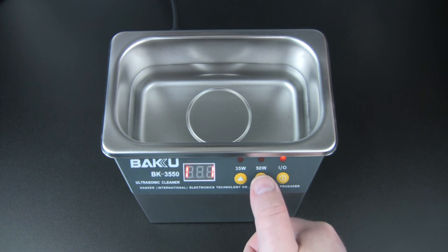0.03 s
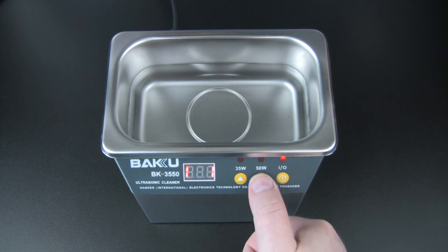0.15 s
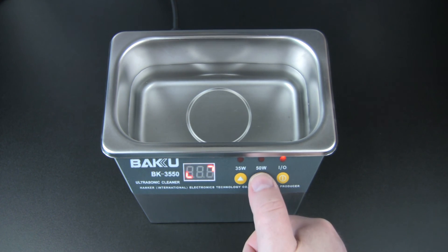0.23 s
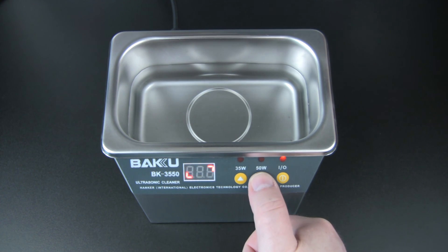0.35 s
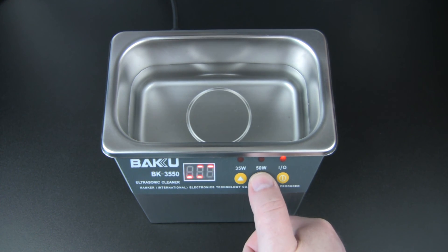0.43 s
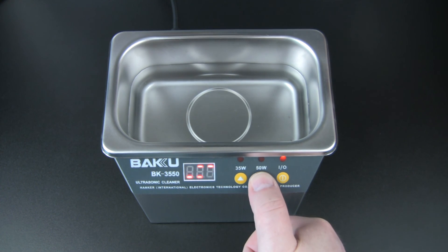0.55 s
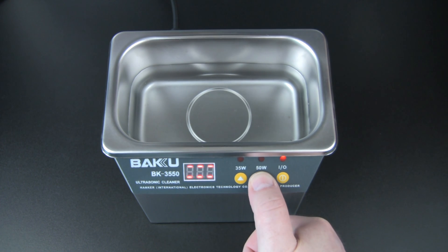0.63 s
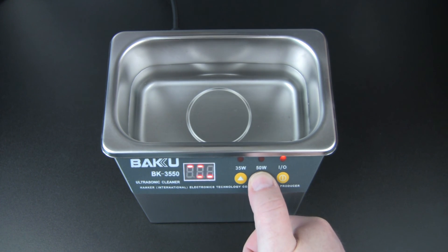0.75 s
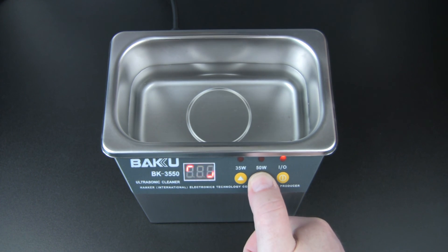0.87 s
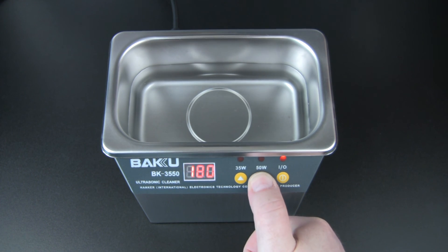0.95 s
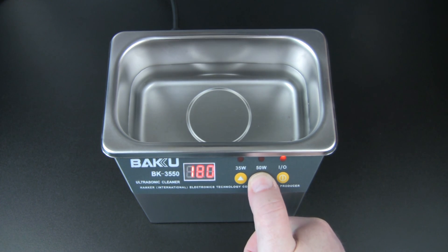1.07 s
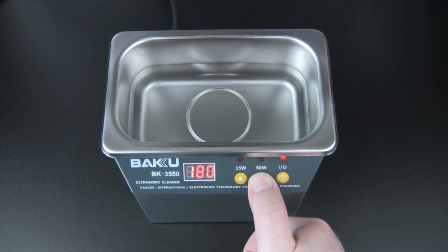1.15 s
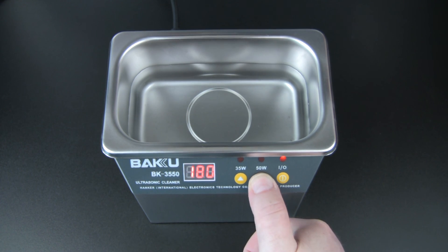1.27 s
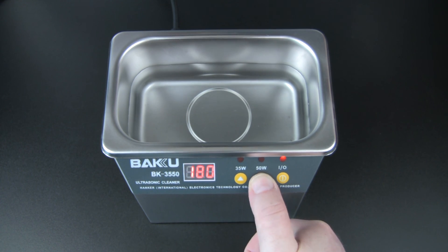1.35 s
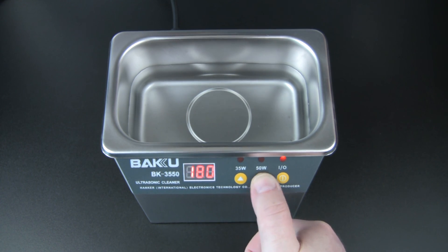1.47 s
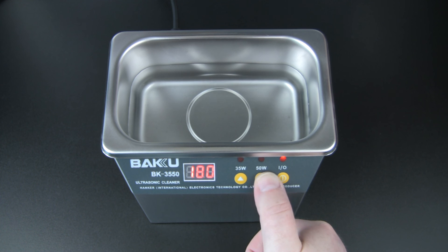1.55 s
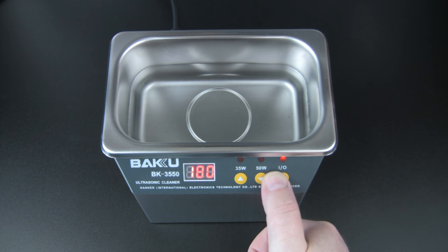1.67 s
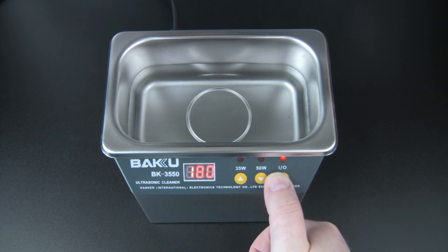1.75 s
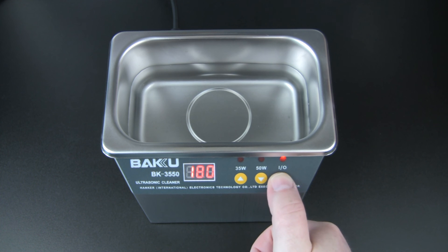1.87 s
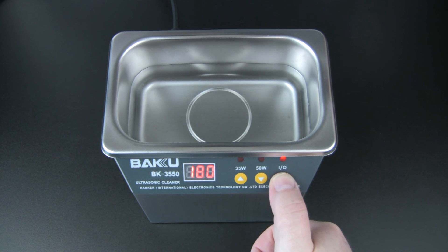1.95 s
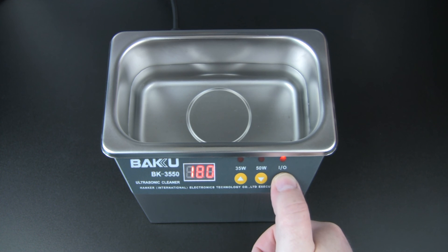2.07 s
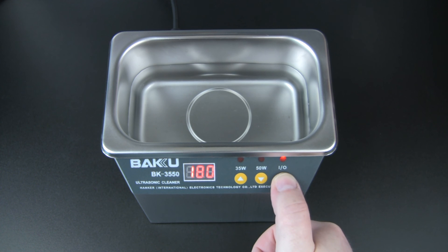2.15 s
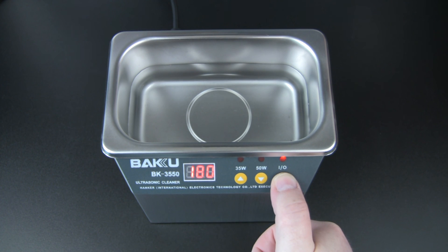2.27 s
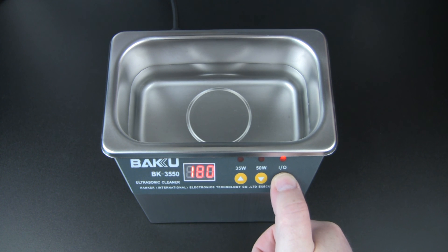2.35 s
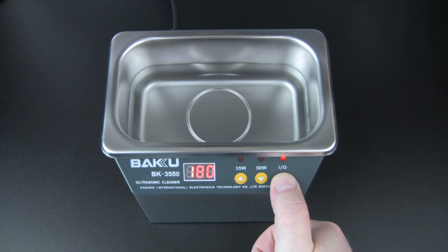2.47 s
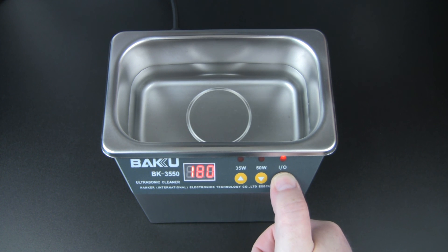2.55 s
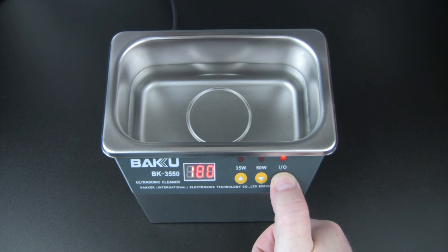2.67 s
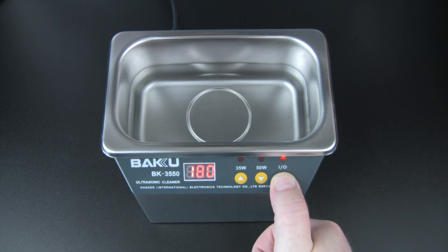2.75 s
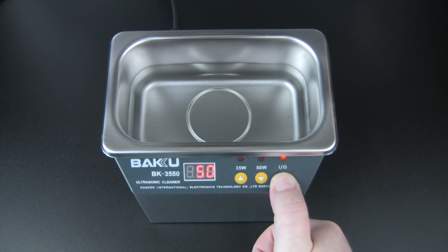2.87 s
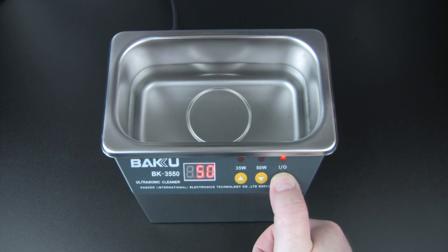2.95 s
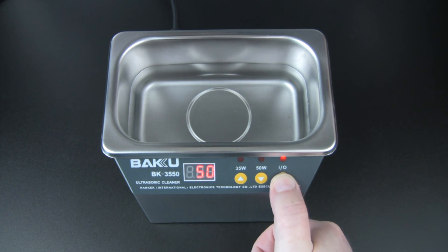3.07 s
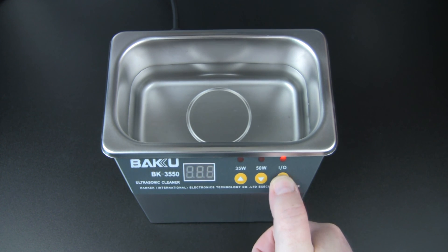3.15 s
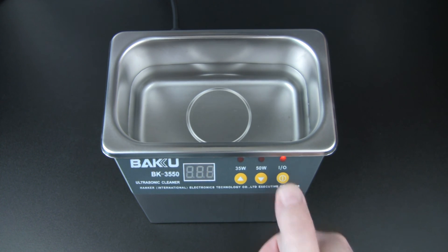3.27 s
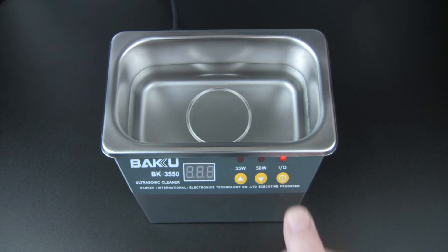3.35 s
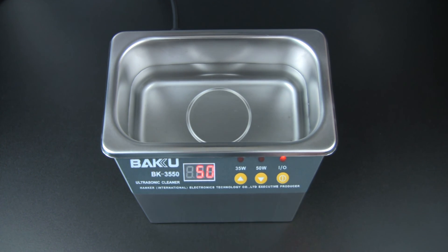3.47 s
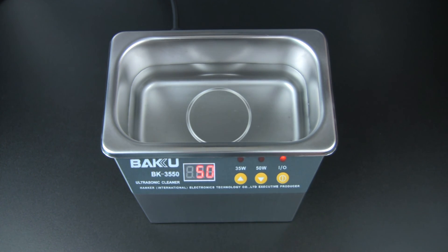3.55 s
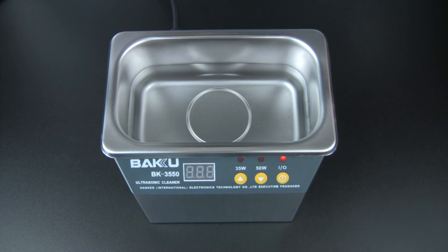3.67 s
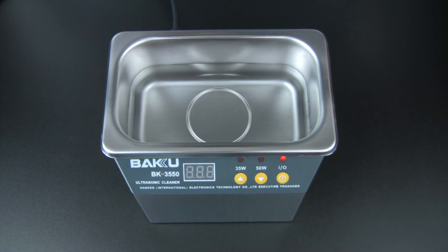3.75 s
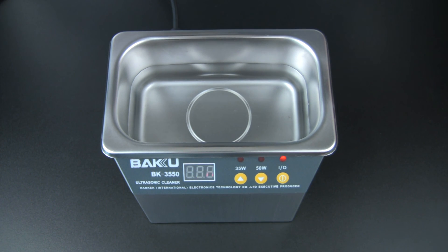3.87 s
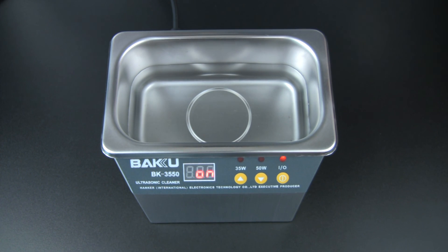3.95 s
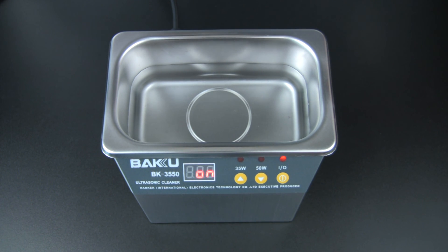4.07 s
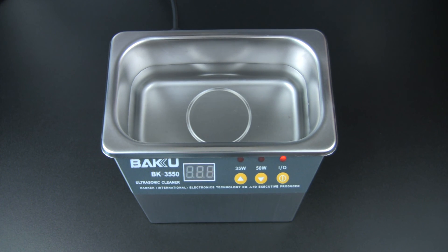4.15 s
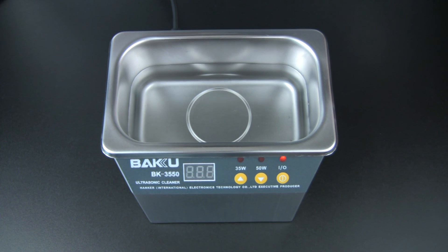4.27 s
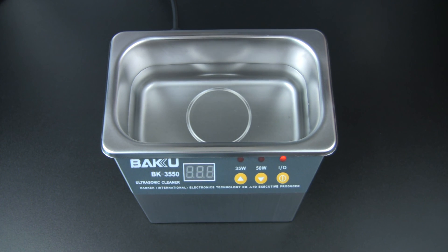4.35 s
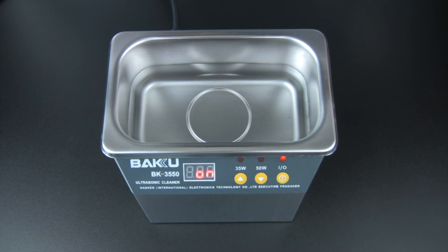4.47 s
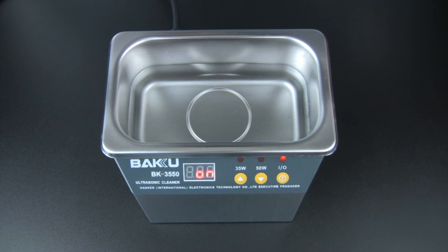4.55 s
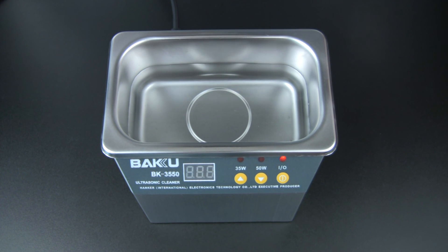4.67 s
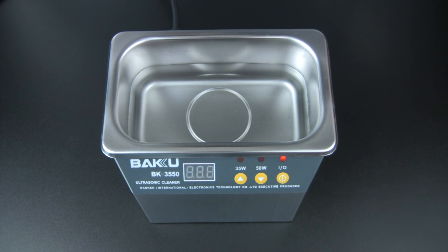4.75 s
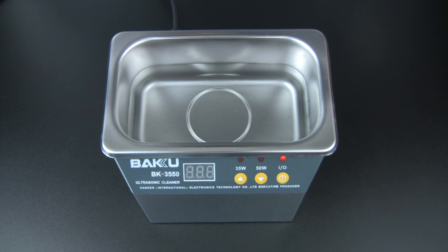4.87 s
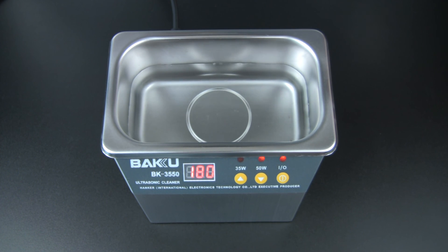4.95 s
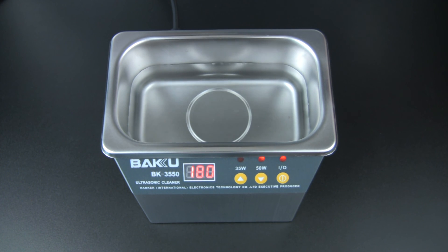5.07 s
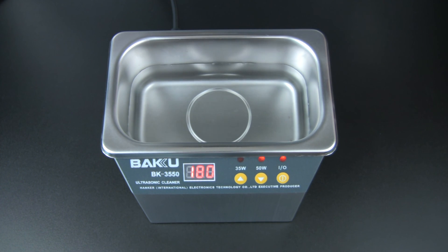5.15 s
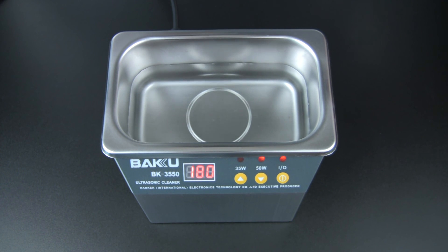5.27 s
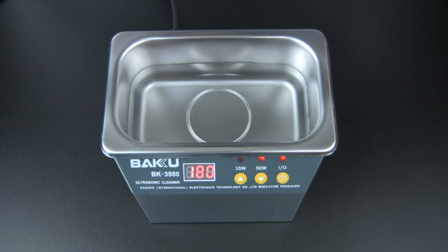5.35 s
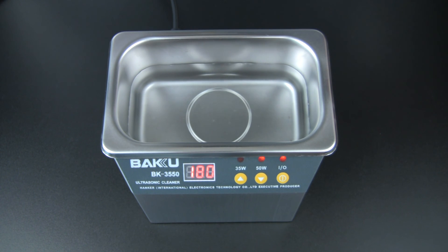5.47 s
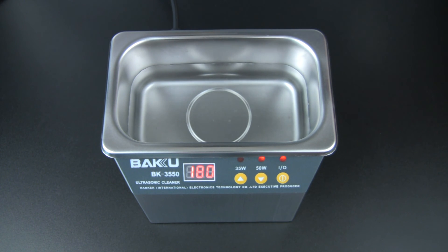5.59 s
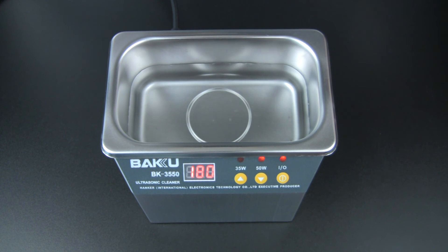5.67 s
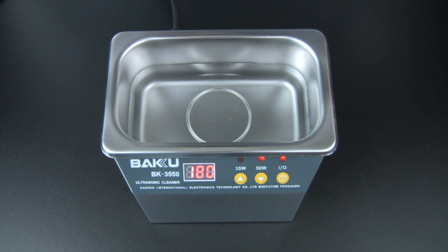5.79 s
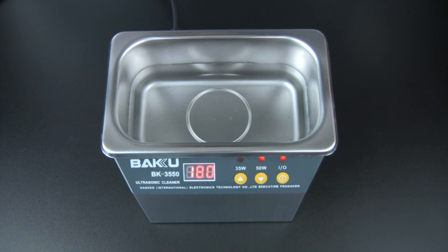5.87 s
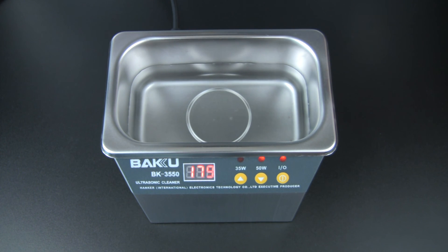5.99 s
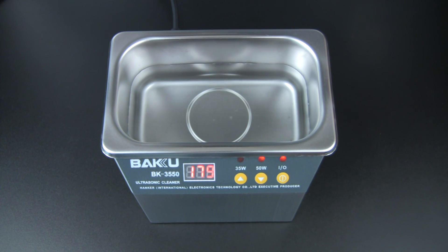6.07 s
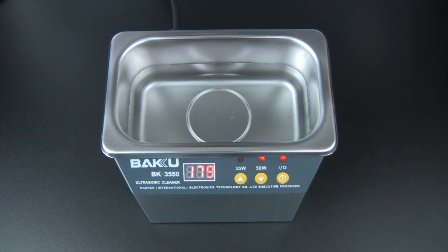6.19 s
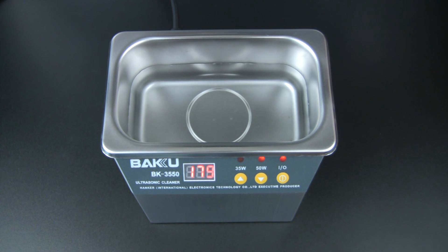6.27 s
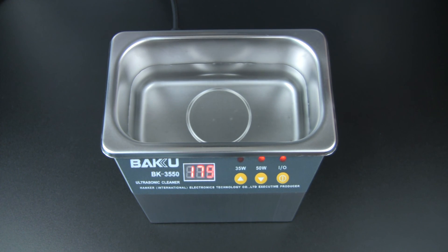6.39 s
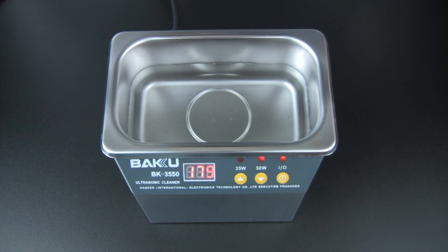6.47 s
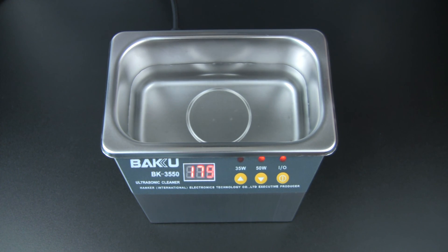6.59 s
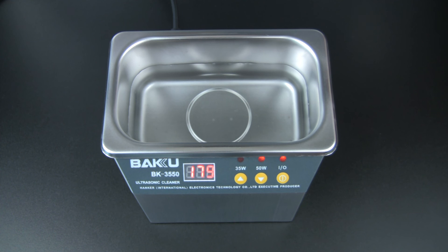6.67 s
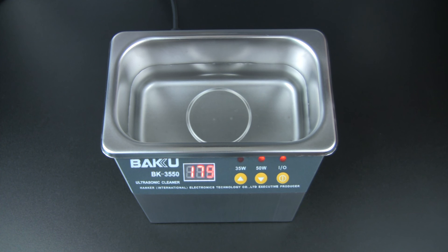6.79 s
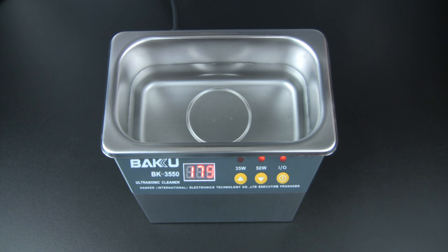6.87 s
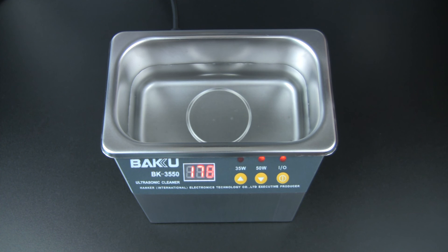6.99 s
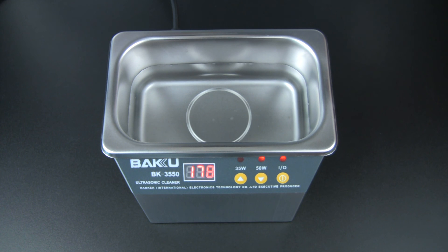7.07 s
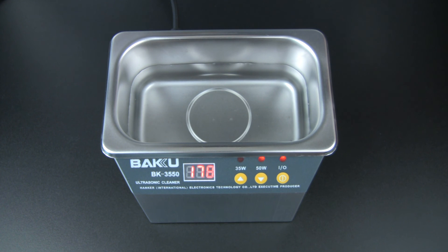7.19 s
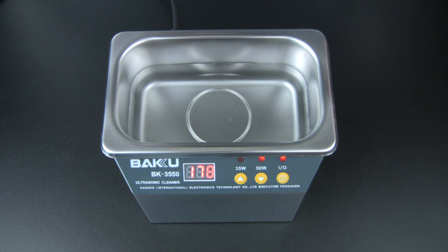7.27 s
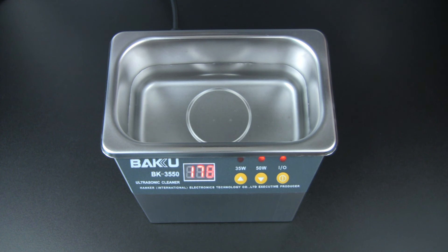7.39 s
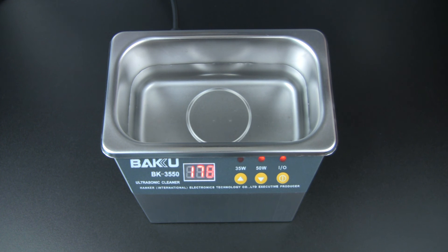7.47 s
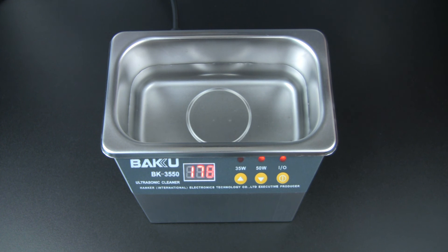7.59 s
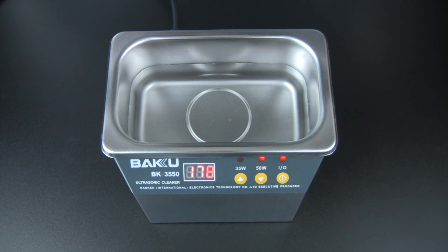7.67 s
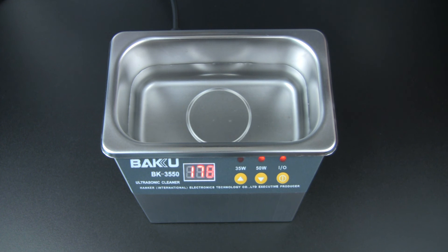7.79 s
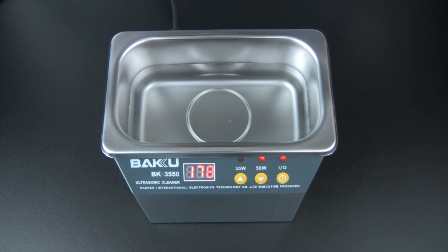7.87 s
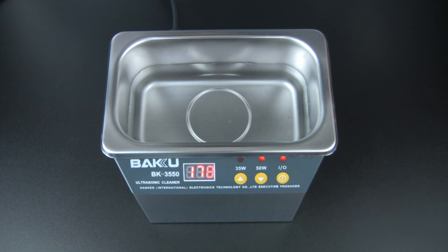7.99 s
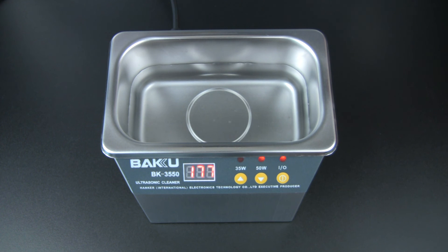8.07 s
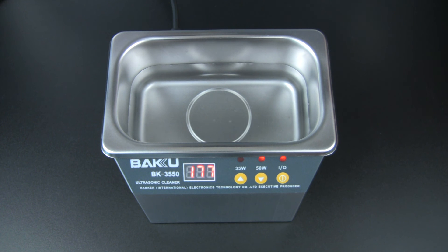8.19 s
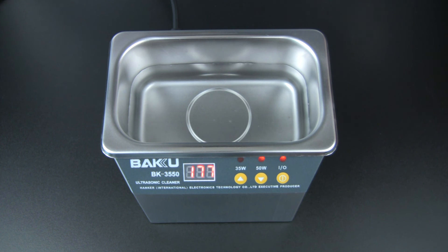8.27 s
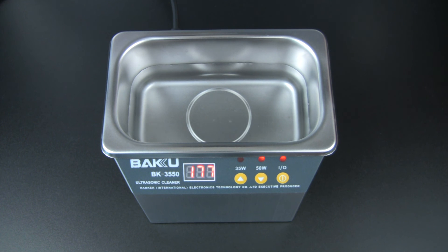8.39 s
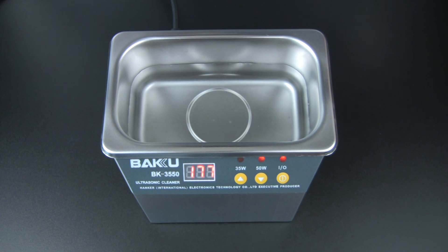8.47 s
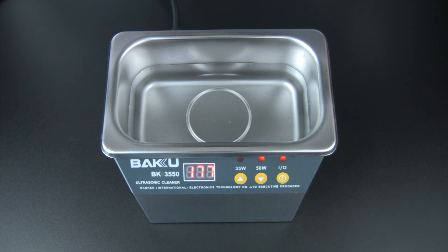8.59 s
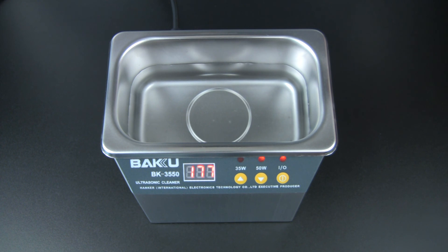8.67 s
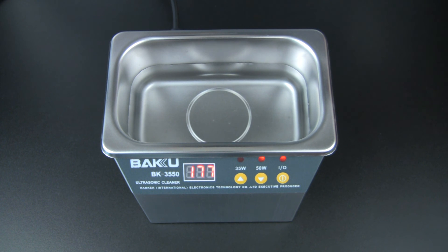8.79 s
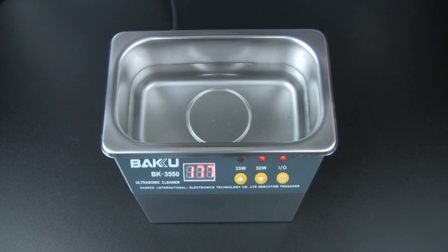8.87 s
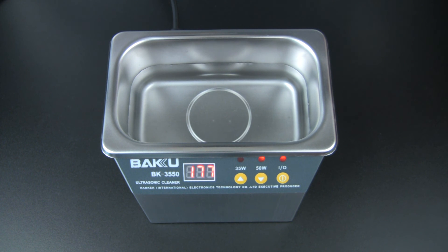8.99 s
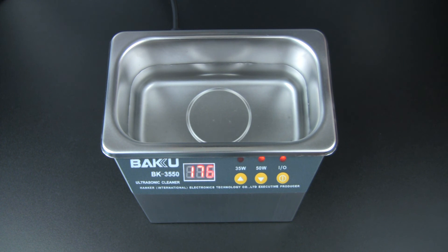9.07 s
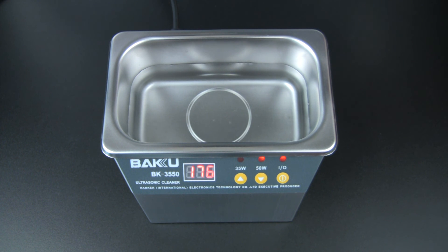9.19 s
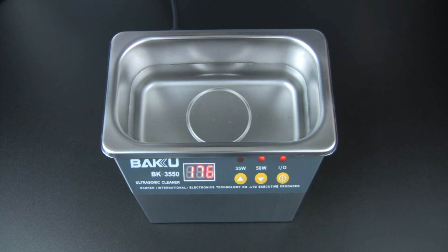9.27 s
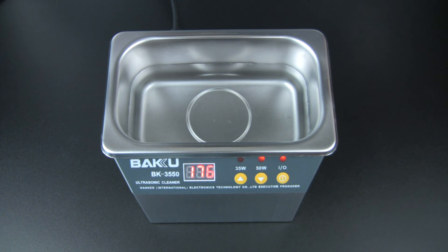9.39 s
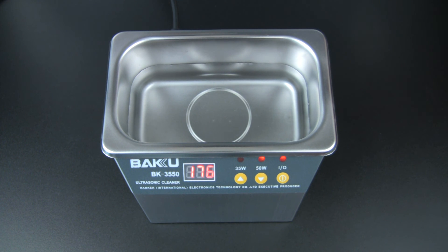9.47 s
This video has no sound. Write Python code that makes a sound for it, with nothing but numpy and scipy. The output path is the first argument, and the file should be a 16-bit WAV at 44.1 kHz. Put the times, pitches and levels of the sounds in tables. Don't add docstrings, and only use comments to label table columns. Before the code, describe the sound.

In a quiet room with soft fan noise, low distant traffic and a faint clock tick each second, a thumb presses a button on a small steel ultrasonic bath: sharp snap in, ringing snap back. A second button clicks the same way two seconds later. After a pause the bath starts with a brief crack and squeal, then holds a harsh electrical buzz under bright, sizzling hiss. Close stereo microphone.

```python
import sys
import numpy as np
from scipy import signal
from scipy.fft import rfft, irfft
from scipy.io import wavfile
from scipy.ndimage import uniform_filter1d, minimum_filter1d

SR = 44100
rng = np.random.default_rng(int(sys.argv[2]) if len(sys.argv) > 2 else 0)


def voltage_ratio(level):
    return 10 ** (np.asarray(level, float) / 20)


def wrap_up_sound(samples):
    columns = np.atleast_2d(samples).T
    tamed = np.clip(columns, -1, 1)
    steps = np.round(tamed * 32767).astype(np.int16)
    wavfile.write(sys.argv[1], SR, steps)


N = 420713
START_S = 4.9535
PULSE_HZ, PULSE_AT_S = 99.949, 6.0102


def evened(x):
    return x / np.sqrt(np.mean(abs(x) ** 2) + 1e-20)


def read(points, hz):
    f, value = np.transpose(points)
    return np.interp(np.log(hz + 1), np.log(f + 1), value)


def curve(rows, column):
    rows = np.array(rows)
    return np.interp(np.arange(N) / SR, rows[:, 0], rows[:, column])


def add(mix, s, sound):
    part = mix[:, round(s * SR):][:, :sound.shape[1]]
    part += sound[:, :part.shape[1]]


def wander(shape, width):
    z = uniform_filter1d(uniform_filter1d(rng.standard_normal((2, *shape)), width), width)
    return evened(z[0] + 1j * z[1])


def bumps(peaks, hz, lift_db):
    power = sum(voltage_ratio(lift_db) ** 2 / (1 + (2 * (hz - f) / width) ** 2) for f, width, _ in peaks)
    return np.sqrt(1 + power)


def noise(gain, same, balance, patchy, length):
    frames, hz = length // 256 + 5, np.fft.rfftfreq(1024, 1 / SR)
    a, b, c, d, patches = rng.standard_normal((frames, 513, 5)).T
    patches = evened(uniform_filter1d(uniform_filter1d(patches, 8, 0), 10, 1))
    same = np.clip(read(same, hz), -1, 1)[:, None]
    left = a + 1j * b
    right = same * left + np.sqrt(1 - same ** 2) * (c + 1j * d)
    right = right * voltage_ratio(-read(balance, hz))[:, None]
    swing = voltage_ratio(read(patchy, hz)[:, None] * patches)
    z = np.array([left, right]) * gain(hz)[:, None] * swing
    x = signal.istft(z, nperseg=1024, noverlap=768)[1][:, :length]
    return x / np.sqrt(np.mean(x.mean(0) ** 2))


# time in seconds, hiss level in dB, change of the buzz in dB.
BATH_COURSE = [
    (4.97, -26.5, 3),
    (5.17, -28, 0.5),
    (9.41, -27.5, 0),
    (9.54, -26.5, 0),
]
# multiple of the pulse rate, level midway in dB, drift in dB per second.
BUZZ_LOW = [(1, -48.9, -0.1), (2, -49.8, 1.4), (3, -40.2, -0.4), (4, -35.6, 0.0), (5, -43.7, 1.0),
            (6, -46.1, 0.2), (7, -48.2, 0.2), (8, -45.0, -0.7), (9, -45.6, -0.2), (10, -42.2, 0.8),
            (11, -38.9, -1.1), (12, -48.7, -1.2), (13, -47.6, 0.4), (14, -48.0, 1.5), (15, -55.7, 1.0),
            (16, -43.6, -1.4), (17, -58.8, -1.9), (18, -43.0, -0.7), (19, -50.8, -1.2), (20, -51.6, 0.9),
            (21, -44.9, 0.5), (22, -49.7, -0.9), (23, -43.7, -1.5), (24, -47.6, -0.1), (25, -53.7, -0.9),
            (26, -51.1, -2.3), (27, -52.2, -0.7), (28, -50.3, -0.6), (29, -58.0, -2.4), (30, -56.5, -0.2)]
# pitch in Hz, level in dB.
BUZZ_HIGH = [(3200, -58), (3300, -49), (3500, -56), (4300, -58), (4500, -53.5), (5200, -60), (5400, -49.5),
             (6000, -52)]
# pitch in Hz, share from 0 up.
UNRUNG_SHARE = [(500, .4), (1000, 1.7)]
# pitch in Hz, delay in ms.
TUB_LAG = [(100, 0), (300, 1), (500, 1.3), (1200, 1.6), (1300, 0), (1900, -.9), (2900, -.9), (3500, 0)]
TUB_FLIPS = [550, 1050]
# pitch in Hz, left over right in dB.
BUZZ_LEFT = [(100, 11), (300, 8), (400, 3), (800, 11), (1000, 0.5), (1900, 3), (2300, 6), (3000, 2)]
# pitch in Hz, lead in radians.
BUZZ_LEFT_LEAD = [(100, -3), (300, -5), (400, -2), (900, -2), (1100, 0), (1450, -0.1), (2000, -0.5),
                  (3000, 0.1)]


def buzz():
    k = np.arange(1, 112)[:, None]
    hz = k * PULSE_HZ
    db = read(BUZZ_HIGH, hz) + 1.2 * rng.standard_normal(k.shape)
    db = np.where(hz > 6150, read(FIZZ_COLOUR, hz) - 53, db)
    drift = np.zeros(k.shape)
    db[:len(BUZZ_LOW), 0], drift[:len(BUZZ_LOW), 0] = np.transpose(BUZZ_LOW)[1:]

    t = np.arange(START_S, N / SR, 1 / SR)
    steps = np.arange(START_S, N / SR + .01, .005)
    since = steps - START_S
    shape = (len(k), len(steps))
    even_db = uniform_filter1d(db, size=5, axis=0) - db
    unrung_db = read(UNRUNG_SHARE, hz) * even_db * np.exp(-since / .16)
    level = np.sqrt(2) * voltage_ratio(db + drift * (steps - 7.25) + unrung_db)

    slow = np.clip((k / 45) ** 2.95, .05, .95)
    flutter = np.clip(0.0059 + 0.0096 * k, 0, .6) * abs(wander(shape, 30))
    flutter = flutter + 0.63 * np.exp(-since / 0.11)
    level = level * (np.sqrt(1 - slow ** 2) + slow * wander(shape, 40) + flutter * wander(shape, 3))

    phase = .4 - 2 * np.pi * PULSE_HZ * np.cumsum(read(TUB_LAG, hz), axis=0) / 1000
    phase += 4.0 * sum(hz > flip for flip in TUB_FLIPS)
    phase += np.clip(k / 30, 0, 2) ** 2 * rng.standard_normal(k.shape)
    lead = read(BUZZ_LEFT_LEAD, hz) - .07 * np.clip(even_db, 0, 8) * (hz > 1150)
    port = voltage_ratio(-read(BUZZ_LEFT, hz)) * np.exp(-1j * lead)
    level = level * np.exp(1j * phase) * 2 / abs(1 + port)

    turn = np.exp(2j * np.pi * PULSE_HZ * (t - PULSE_AT_S))
    phasor, out = np.ones(len(t)), np.zeros((2, len(t)))
    for tone_level, right in zip(level, port[:, 0]):
        phasor = phasor * turn
        tone = np.interp(t, steps, tone_level) * phasor
        out[0] += tone.real
        out[1] += (tone * right).real
    build = 1 - .6 * np.exp(-(t - START_S) / .07)
    return out * build * voltage_ratio(curve(BATH_COURSE, 2)[-len(t):])


# pitch in Hz, level in dB per Hz.
FIZZ_COLOUR = [(100, -20), (1400, -13.5), (2000, -9.5), (2750, -8.5), (3150, -13.5), (4300, -15.5),
               (4900, -11.5), (5200, -14.5), (5700, -5.5), (7300, -9.5), (8600, -2), (12500, -0.5),
               (14300, -4), (15800, -10)]
# pitch in Hz, width in Hz, level in dB (unused: all stand equally
TUB_WALLS = [(4910, 83, -8), (5500, 34, -4), (5890, 44, -3), (6360, 53, -6), (6800, 37, -10),
             (7360, 58, -9), (7900, 27, -6), (8400, 40, -1), (8690, 110, -2), (9820, 160, -2),
             (10300, 50, -2), (11100, 74, -2), (11800, 63, -3), (12100, 70, -2), (12700, 110, 0),
             (15300, 230, -9)]
# pitch in Hz, likeness from -1 to 1.
FIZZ_ALIKE = [(60, -.79), (290, -1.1), (640, -0.55), (1410, -0.91), (3100, 0.00062), (6820, 0.5),
              (10000, 0.078), (13000, 0.5)]
# pitch in Hz, left over right in dB.
FIZZ_LEFT = [(60, 11), (110, 1), (200, 7.5), (380, 6), (700, 7.0), (1290, -7), (2380, 5), (4400, 0.5),
             (8120, 1), (15000, 3.5)]
# pitch in Hz, swing in dB.
FIZZ_SWING = [(100, 2), (2500, 1), (3200, 4), (5200, 3), (6000, 1.5), (16000, 0)]


def fizz():
    t = np.arange(START_S, N / SR, 1 / SR)

    def colour(hz):
        return voltage_ratio(read(FIZZ_COLOUR, hz)) * bumps(TUB_WALLS, hz, 5.8)

    x = noise(colour, FIZZ_ALIKE, FIZZ_LEFT, FIZZ_SWING, len(t))
    high = signal.sosfilt(signal.butter(2, 9000, "high", fs=SR, output="sos"), x)
    throb = -np.cos(2 * np.pi * PULSE_HZ * (t - PULSE_AT_S - .001))
    x = x + 0.43 * throb * high
    onset = 1 - np.exp(-(t - START_S) / .002)
    return x * onset * voltage_ratio(curve(BATH_COURSE, 1)[-len(t):] + .5)


# pitch in Hz, delay in seconds, length in seconds, level in dB.
WALL_SQUEAL = [(8120, 0.0024, 0.011, -14), (10600, .002, 0.003, -11), (9500, 0.0037, .006, -24)]


def jolt():
    t = np.arange(SR // 10) / SR
    crack = rng.standard_normal((2, len(t))) + rng.standard_normal(len(t))
    crack = signal.sosfilt(signal.butter(2, 11000, fs=SR, output="sos"), crack)
    crack = voltage_ratio(-16.0) * crack * t / 0.0038 * np.exp(-t / 0.0051)
    squeal = 0
    for hz, s, long, db in WALL_SQUEAL:
        swell = np.sin(np.pi * np.clip((t - s) / long, 0, 1) ** 0.4)
        squeal = squeal + voltage_ratio(db) * np.sin(2 * np.pi * hz * t) * swell
    return crack + squeal * voltage_ratio(np.array([[1.5], [-1.5]]))


# pitch in Hz, time to fade by 60 dB in seconds,
# level in dB from the middle button, level in dB from the right button.
CASE_RING = [(339.7, 0.2, -1, 1), (430, 0.13, -16, -22), (430, 0.3, -20, -8), (518, 0.53, -20.5, -17),
             (564, 0.34, -17, -6.5), (624, 0.41, -14, -16), (730, 0.3, -21, -12), (774, 0.14, -5, -2.5),
             (860, 0.41, -18, -18), (847, 0.048, 3.5, 7), (1008, 0.36, -21, -3), (1100, 0.13, -28, -10),
             (1130, 0.19, -38, -10), (1580, 0.12, -13, -5.5), (1630, 0.081, -9, -14.5),
             (2160, 0.12, -1, -38), (2330, 0.15, -25, -32), (3100, 0.14, -13, -30), (4660, .11, -22, -40),
             (5400, 0.082, -24, -30), (5730, 0.069, -20, -30)]
TUB_RING = [(368, 0.27, 2.5, -1.5), (387.3, 0.22, 8.5, -1.5)]
# pitch in Hz, lead in radians.
CLICK_LEFT_LEAD = [(0, -0.92), (600, 0.015), (1500, 0.054), (16000, 0.11)]
# pitch in Hz, left over right in dB.
CLICK_LEFT = [(60, 2.5), (110, 2), (200, 2), (380, 2), (700, 3), (1290, -0.5), (2380, 2.5), (4400, 3),
              (8120, 1.5), (15000, 0.0)]
# pitch in Hz, level in dB per Hz.
SNAP_IN = [(180, -39), (300, -7.5), (656, -9), (885, -4), (1280, -14.5), (1610, -8.5), (2100, -18.5),
           (3130, -15), (4000, -22), (4700, -14.5), (6000, -13.5), (7300, -16), (9500, -13.5), (16000, -33)]
# pitch in Hz, level in dB per Hz.
SNAP_BACK = [(180, -32), (300, -10), (392, -9), (614, -7), (1030, -10), (1430, -7), (2030, -9), (2210, -10),
             (2360, -12), (3830, -15), (7440, -49), (9090, -46), (16000, -80)]
# pitch in Hz, time to fade by 60 dB in seconds.
ROOM_TAIL = [(500, 0.56), (1320, 0.38), (3480, 0.29), (9190, 0.17)]


def ringing(modes, button, t, after):
    return sum(voltage_ratio(middle + button * (right - middle) - 60 * after / t60) * np.sin(2 * np.pi * hz * after)
               for hz, t60, middle, right in modes)


def click(ring_db, snap_db, bright, button):
    t = np.arange(SR // 2) / SR
    late = np.maximum(t - .009, 0)
    ring = ringing(CASE_RING, button, t, t)
    ring += ringing(TUB_RING, button, t, late) * (1 - np.exp(-late / 0.019))
    ring *= 1 - np.exp(-t / 0.0014)
    hz = np.fft.rfftfreq(len(t), 1 / SR)
    port = voltage_ratio(-read(CLICK_LEFT, hz)) * np.exp(-1j * read(CLICK_LEFT_LEAD, hz))
    right = irfft(rfft(ring) * port, len(t)) * (t < .45) * (1 - np.exp(-t / 0.00055))
    ring = np.array([ring, right])

    shared, *apart = rng.standard_normal((3, len(t)))
    hz, frame_s, z = signal.stft(shared + .5 * np.array(apart), SR, nperseg=128)
    colour = voltage_ratio(bright * read(SNAP_IN, hz) + (1 - bright) * read(SNAP_BACK, hz))[:, None]
    tail = voltage_ratio(-10.0 - 60 * frame_s / read(ROOM_TAIL, hz)[:, None])
    decay = voltage_ratio(-60 * frame_s / 0.037) + tail
    snap = signal.istft(z * colour * decay, SR, nperseg=128)[1][:, :len(t)]
    snap *= (1 - np.exp(-t / 0.00057)) / np.sqrt(np.mean(snap[:, :400] ** 2))
    return voltage_ratio(ring_db) * ring + voltage_ratio(snap_db) * snap


# start in seconds, level in dB.
CLOCK_TICKS = [(.15, -56), (1.16, -58), (2.164, -54.5), (3.17, -60), (4.17, -55)]


def clock():
    out = np.zeros((2, N))
    t = np.arange(SR // 4) / SR
    band = signal.butter(3, [1700, 2550], "band", fs=SR, output="sos")
    for s, db in CLOCK_TICKS:
        tick = signal.sosfilt(band, rng.standard_normal((2, len(t))) + rng.standard_normal(len(t)))
        edge = uniform_filter1d(rng.standard_normal((2, len(t))), size=5)
        edge = voltage_ratio(-6 - 60 * t / .12) * edge
        add(out, s, voltage_ratio(db) * (voltage_ratio(-60 * t / 0.36) * evened(tick) + edge))
    return out


def rumble(peak_s, hz, db, fade_db_per_s):
    t = np.arange(N) / SR
    sway = wander((1, N // 200 + 2), 9)[0]
    sway = 0.76 + .5 * np.interp(np.arange(N), np.arange(len(sway)) * 200, sway)
    approach_db = 25 * (peak_s - t)
    level = voltage_ratio(db - np.maximum(approach_db, fade_db_per_s * (t - peak_s)))
    return level * (sway * np.exp(2j * np.pi * hz * t)).real


# loudest moment in seconds, pitch in Hz, level in dB, fade in dB per second.
FAR_TRAFFIC = [(.35, 76.6, -54, 5), (.7, 110, -50, 20), (2.05, 61, -51.5, 13), (2.64, 61, -53, 18),
               (3.88, 60.2, -49.5, 7), (6.55, 76, -55, 20), (6.4, 60.4, -58, 15), (8.3, 60, -61, 1)]
# pitch in Hz, level in dB.
HUM = (170, -70)


def traffic_and_hum():
    low = sum(rumble(*row) for row in FAR_TRAFFIC) + rumble(0, *HUM, 0)
    return low * voltage_ratio(np.array([[3.5], [.5]]))


# pitch in Hz, level in dB.
CAMERA_WHINE = [(3494, -84), (4048, -84), (4199, -79), (4495, -84), (4657, -83), (4770, -84), (5238, -85),
                (5399, -81), (5722, -83), (5841, -84), (5938, -87), (6298, -86), (9152, -82), (9216, -85),
                (11100, -88), (11332, -83)]


def whine():
    t = np.arange(N) / SR
    return sum(np.sqrt(2) * voltage_ratio(db) * np.sin(2 * np.pi * hz * t) for hz, db in CAMERA_WHINE)


# pitch in Hz, level in dB per Hz.
AIR_COLOUR = [(53, -14), (90, -1), (154, 1.5), (343, -1.5), (800, -7.5), (1250, -9.5), (1700, -18),
              (3300, -25.5), (6300, -28.5), (7600, -30), (11900, -28), (12500, -39), (14800, -41),
              (15700, -55)]
# pitch in Hz, width in Hz, level in dB (unused: all stand equally
FAN_PEAKS = [(786, 39, 0), (1020, 38, -2), (4200, 23, -18), (4660, 26, -21), (5400, 23, -20),
             (5730, 44, -19), (9160, 67, -20), (11300, 36, -22)]
# pitch in Hz, likeness from -1 to 1.
AIR_ALIKE = [(60, 0.044), (130, -0.29), (290, -0.45), (640, 0.47), (1410, 0.53), (3100, 0.23),
             (6820, -0.12), (15000, -0.4)]
# pitch in Hz, left over right in dB.
AIR_LEFT = [(60, -5), (110, -0.5), (200, 1.5), (380, -1.5), (700, 2.5), (1290, 1), (2380, 0), (4400, 0.5),
            (8120, -1.5), (15000, -4)]


def fan_and_air():
    def colour(hz):
        return voltage_ratio(read(AIR_COLOUR, hz)) * bumps(FAN_PEAKS, hz, 6.1)

    swing = [(100, 1.85), (8000, 0.95)]  # (Hz, dB)
    return voltage_ratio(-50) * noise(colour, AIR_ALIKE, AIR_LEFT, swing, N)


# start in seconds, ring level in dB, snap level in dB,
# brightness from 0 (snapping back) to 1 (snapping in), button from 0 (middle) to 1 (right).
BUTTON_CLICKS = [
    (0.686, -44.5, -74, .2, 0.3),
    (0.8993, -24, -23.5, 0.9, 0.05),
    (1.253, -20, -26, 0.17, 0.1),
    (2.591, -36.5, -53, 0.9, 0.46),
    (2.7835, -26.5, -25, 0.98, 0.88),
    (3.053, -24.5, -28, 0.43, 0.95),
]


def scene():
    mix = fan_and_air() + traffic_and_hum() + whine() + clock()
    for s, *row in BUTTON_CLICKS:
        add(mix, s, click(*row))
    for part in (buzz(), fizz(), jolt()):
        add(mix, START_S, part)
    return mix


# pitch in Hz, limit in dB.
HIDDEN_BELOW = [(2500, -40), (2900, -12.3), (3700, -13), (4600, -13), (5300, -11), (7800, -14.5),
                (8500, -40)]


def hush_hidden_bands(x):
    hz, _, z = signal.stft(x, SR, nperseg=2048, noverlap=1536)
    power = (abs(z) ** 2).mean(0)
    band = uniform_filter1d(power, size=5, axis=0)
    top = power[(hz > 8000) & (hz < 13000)].mean(0)
    top = minimum_filter1d(uniform_filter1d(top, size=5), size=11)
    over_db = 10 * np.log10(abs(band) / (abs(top) + 1e-20) + 1e-9) - read(HIDDEN_BELOW, hz)[:, None]
    keep = np.clip(.5 + over_db, .03, 1)
    return signal.istft(z * keep, SR, nperseg=2048, noverlap=1536)[1][:, :N]


def roll_off(x):
    return signal.sosfilt(signal.butter(12, 16020, fs=SR, output="sos"), x)


def record(dry):
    cut = signal.sosfilt(signal.butter(2, 48, "high", fs=SR, output="sos"), dry)
    low_pass = signal.firwin(1023, 15740, window=("kaiser", 10), fs=SR)
    cut = signal.oaconvolve(cut, low_pass[None], "same")
    return roll_off(hush_hidden_bands(cut))


dry = scene()
out = record(dry)
wrap_up_sound(out)
```